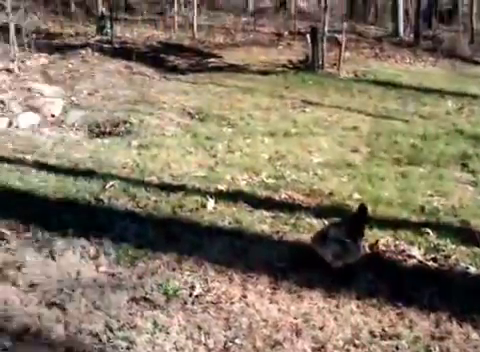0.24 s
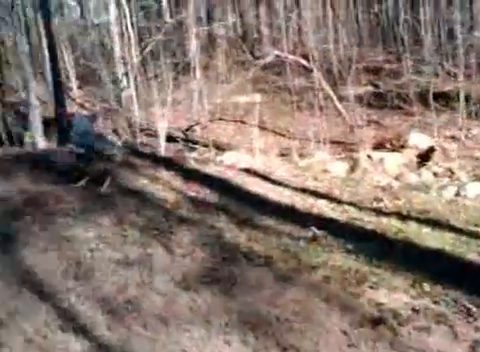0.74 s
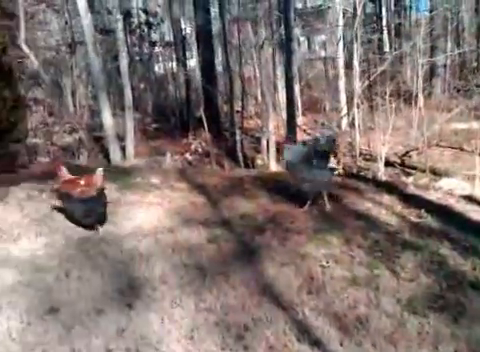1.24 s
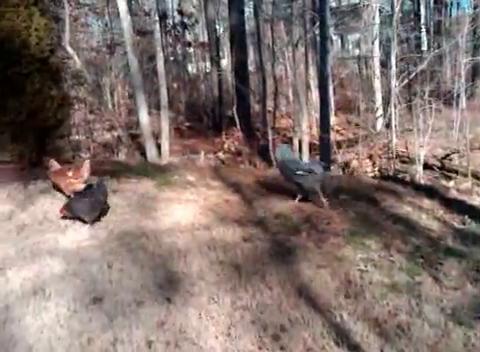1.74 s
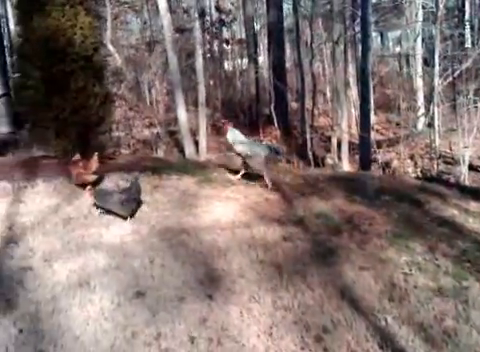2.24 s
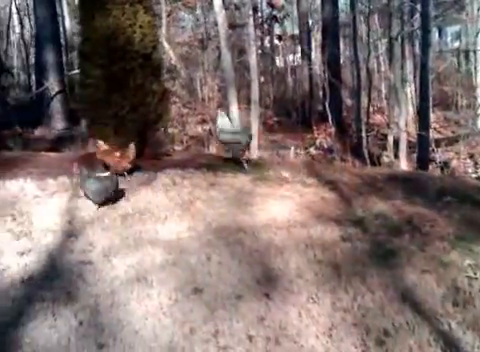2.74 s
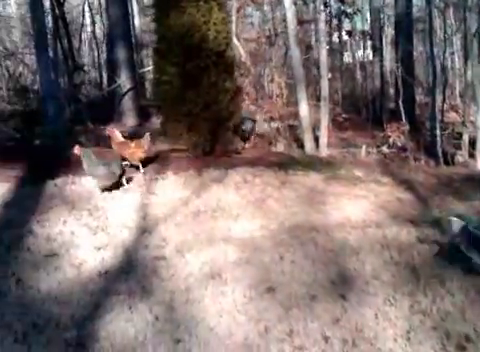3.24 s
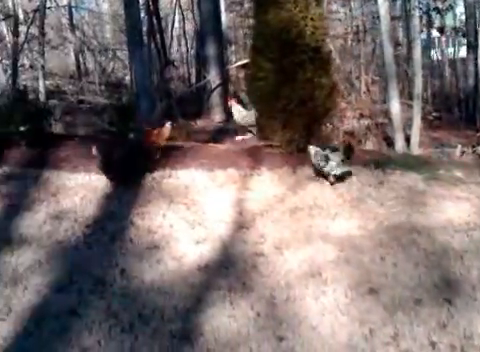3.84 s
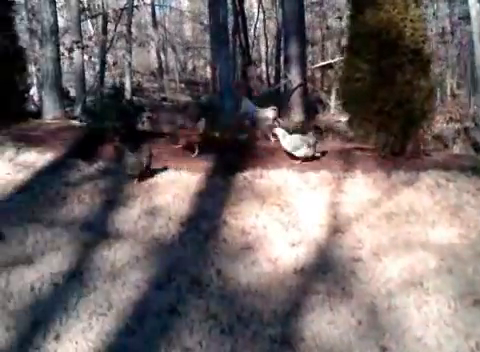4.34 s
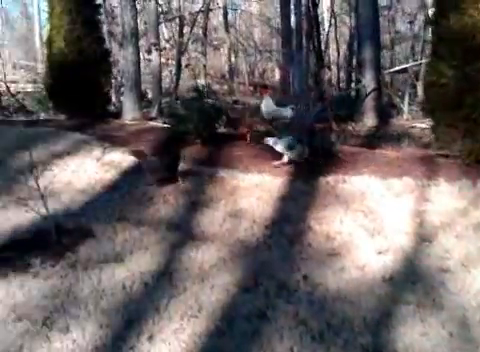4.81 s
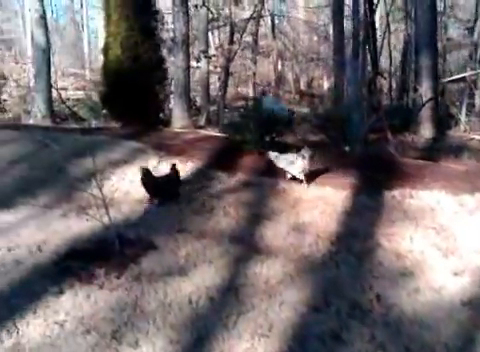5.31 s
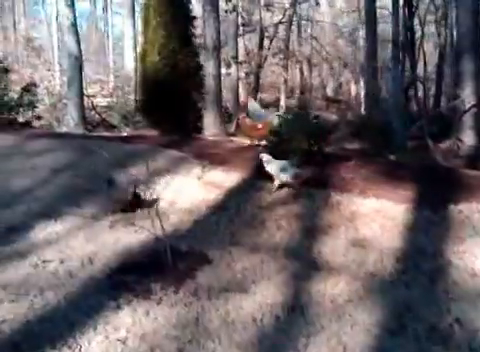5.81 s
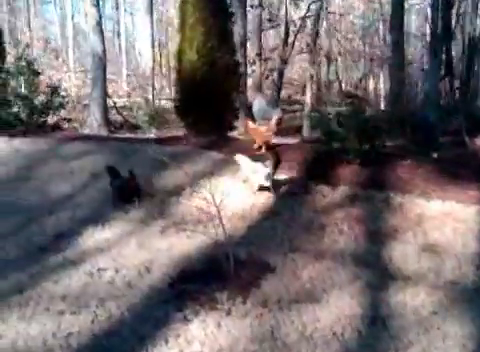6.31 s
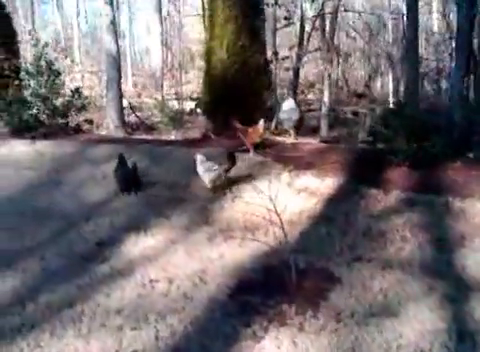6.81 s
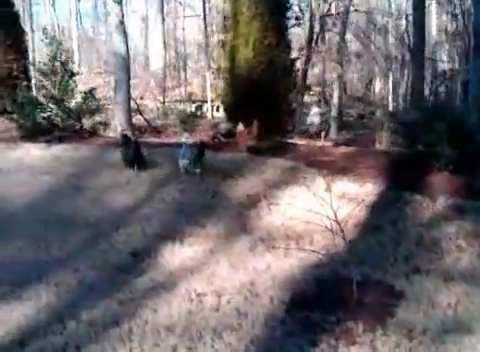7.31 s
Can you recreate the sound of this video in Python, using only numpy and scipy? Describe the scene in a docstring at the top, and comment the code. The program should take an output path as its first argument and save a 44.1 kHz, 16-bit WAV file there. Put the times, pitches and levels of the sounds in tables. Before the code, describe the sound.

Outdoors at the edge of a wood, chickens a few metres away scratch through dry leaves and pine straw. A raspy throbbing hen call and cracking twigs come first amid rumbling, thumping wind on the microphone. Then crisp footsteps and stalk ticks grow busiest, with one sharp twig snap, before soft low clucks, scattered rustles and a few last wind thumps.

```python
"""Chickens roam over dry leaves and pine straw at the edge of a wood, a few metres away.
At first, feet crush swarms of brittle leaf fragments, a hen rasps and twigs crack in rumbling, thumping wind.
From about 2 to 4 seconds the steps are busiest: stalks tick, curled leaves cave in and one more twig cracks.
Then come soft clucks, made of short gliding voice cycles with hoarse air, most of them around 5 seconds.
Steps and ticks return, with wind thumps and a few last clucks; the flock stirs the litter all along."""
import sys
import numpy as np
from scipy import signal
from scipy.fft import rfft, irfft, next_fast_len
from scipy.io import wavfile
from scipy.ndimage import uniform_filter1d

SR = 44100
rng = np.random.default_rng(int(sys.argv[2]) if len(sys.argv) > 2 else 0)


def dump(signal):
    """Clip the signal to [-1, 1] and save it as 16-bit WAV at the path in sys.argv[1]."""
    limited = np.clip(np.atleast_2d(signal).T, -1, 1)
    pcm = np.round(limited * 32767).astype(np.int16)
    wavfile.write(sys.argv[1], SR, pcm)


N = 333101
T = np.arange(N) / SR  # time of every sample in seconds
TOP_HZ = 7400  # upper edge of the microphone's band


def undb(db):
    """Turn decibels into gain."""
    return 10 ** (np.asarray(db) / 20)


def unit(x):
    """Scale to an average strength (rms) of 1."""
    return x / np.sqrt(np.mean(x ** 2) + 1e-30)


def curve(rows):
    """Join the columns of a table by straight lines in time; the first column is the time."""
    s, *columns = np.transpose(rows)
    return [np.interp(T, s, c) for c in columns]


def tint(x, points):
    """Colour a sound with the given (Hz, dB) spectrum, with no sound ahead of its cause."""
    size = next_fast_len(len(x) + 4096, True) // 2 * 2
    hz, db = np.transpose(points)
    bin_hz = np.arange(size // 2 + 1) * SR / size
    log_gain = np.log(undb(np.interp(np.log(bin_hz + 1), np.log(hz), db)))
    # folding the cepstrum gives the filter that reacts soonest (minimum phase)
    cepstrum = irfft(log_gain)
    cepstrum[1:size // 2] *= 2
    cepstrum[size // 2 + 1:] = 0
    response = np.exp(rfft(cepstrum))
    return irfft(rfft(x, size) * response)[:len(x)]


def ring(x, hz, width_hz):
    """Pass a sound through one resonance, with gain 1 at its centre."""
    return signal.lfilter(*signal.iirpeak(hz, hz / width_hz, fs=SR), x)


def top_cut(x):
    """Cut steeply above the edge of the microphone's band."""
    return signal.sosfilt(signal.ellip(10, .2, 70, TOP_HZ, fs=SR, output="sos"), x)


def walk(rate, size):
    """Wander at random without jumps, with a spread near 1 and about `rate` new aims per second."""
    k = max(int(SR / rate), 2)
    held = np.repeat(rng.standard_normal(size // k + 1), k)
    return uniform_filter1d(held, k)[:size] * np.sqrt(3 / 2)


def around(s, before, after):
    """Give the samples near a moment, and their times relative to it."""
    span = slice(max(int((s - before) * SR), 0), min(int((s + after) * SR), N))
    return span, T[span] - s


def ping(t, hz, crest_s):
    """A ring that starts at t = 0, swells to its crest and dies within a few cycles."""
    age = np.maximum(t, 0) / crest_s
    return np.sin(2 * np.pi * hz * t) * age * np.exp(1 - age)


def fragments(rate, spread_db, spectrum, own_db=3, focus_hz=1100):
    """Tiny fractures of unequal size; each rings around its own pitch, and the colour shifts by leaf."""
    leaves_per_s, shift_db = 30, 2.5
    at = rng.integers(0, N, int(rate * N / SR))
    size = undb(spread_db * np.minimum(rng.standard_normal(len(at)), 2))
    leaf = at * leaves_per_s // SR
    pitch = rng.uniform(-1000, 8500, len(at))
    out = 0
    for hz in np.arange(250, 7500, 500):
        colour = undb(own_db * np.clip(rng.standard_normal(len(at)), -2, 2))
        colour = colour / (1 + ((hz - pitch) / focus_hz) ** 2)
        colour = colour * undb(shift_db * rng.standard_normal(leaf.max() + 1)[leaf])
        sign = rng.choice([-1, 1], len(at))
        clicks = np.bincount(at, size * colour * sign, N)
        out = out + ring(clicks, hz, 600)
    return unit(top_cut(tint(out, spectrum)))


def wind(gust_db=-2.0, flutter_db=3.0, buffet_db=-1, buffet_flutter_db=3, hush_db=-57.5):
    """Eddies rumble and buffet on the microphone over the steady hush of the wood."""
    # Wind on the microphone. Each row: time in seconds, level in dB before gust_db.
    wind_levels = [(0, -53.5), (.3, -54), (.39, -42), (.5, -54), (.61, -44), (.72, -50), (1.1, -46),
                   (1.32, -43.5), (1.5, -51), (1.6, -55), (2.48, -59.5), (2.69, -50), (3.0, -57),
                   (4.35, -57.5), (4.83, -52), (5.3, -51), (5.78, -48.5), (6.2, -53), (6.4, -51),
                   (6.68, -52.5), (6.81, -51), (7.36, -56.5), (7.55, -43.5)]
    # Buffeting as the microphone moves through the air. Each row: time in seconds, level in dB before buffet_db.
    buffet_levels = [(0, -74), (.3, -60.5), (.55, -53), (.83, -60.5), (.93, -50), (.97, -54.5), (1.04, -48),
                     (1.12, -54.5), (1.2, -67), (1.35, -57), (1.6, -79), (2.55, -60.5), (2.7, -58.5),
                     (3.4, -63), (3.9, -67.5), (6.2, -68), (7.55, -60)]
    # Colours of rumble, buffeting and hush. Each row: frequency in Hz, relative strength in dB per Hz.
    gust_colour = [(10, -6), (25, 2.5), (45, -6.5), (70, -4.5), (110, -20), (180, -22.5), (400, -42),
                   (1500, -72.5)]
    buffet_colour = [(30, -9.5), (70, -3), (170, -1.5), (300, -11.5), (600, -16), (1500, -28.5),
                     (6000, -63.5)]
    hush_colour = [(20, -11), (55, -2.5), (85, 1), (115, -6), (160, -9), (250, -13.5), (500, -16.5),
                   (800, -20.5), (1300, -27.5), (2400, -33.5), (5800, -39), (7400, -44)]

    rumble_db = curve(wind_levels)[0] + gust_db + flutter_db * walk(9, N)
    rumble = unit(tint(rng.standard_normal(N), gust_colour)) * undb(rumble_db)
    swing_db = curve(buffet_levels)[0] + buffet_db + buffet_flutter_db * walk(25, N)
    buffet = unit(tint(rng.standard_normal(N), buffet_colour)) * undb(swing_db)
    hush = unit(top_cut(tint(rng.standard_normal(N), hush_colour))) * undb(hush_db)
    return rumble + buffet + hush


def thumps(cycles=0.57, gain_db=-1.0):
    """A large eddy or a jolt shoves the microphone's diaphragm once or twice."""
    # Single gusts and jolts. Each row: crest in seconds, level in dB before gain_db, pitch in Hz.
    thump_table = [(.397, -44, 68.6), (.55, -37, 53), (.605, -35.5, 46.3), (.648, -42, 37.7),
                   (.788, -38, 65), (.904, -39.5, 190), (.908, -37, 30), (1.023, -34, 320),
                   (1.073, -34, 69), (1.125, -36.5, 38.5), (1.284, -36, 75.5), (1.337, -34.5, 62),
                   (1.431, -36, 45), (1.505, -37.5, 49.5), (5.726, -37, 33.5), (5.794, -40.5, 40),
                   (6.325, -44.5, 85), (6.433, -41, 80), (6.606, -38, 72), (6.762, -36.5, 42),
                   (6.836, -33, 49), (6.982, -38.5, 32.7), (7.149, -40, 40.4), (7.533, -35, 44.4)]
    out = np.zeros(N)
    for s, db, hz in thump_table:
        span, t = around(s, .08, .08)
        swell = np.exp(-(t * hz / cycles) ** 2)
        out[span] += undb(db + gain_db) * swell * np.sin(2 * np.pi * (hz * t + rng.random()))
    return out


def clucks(beak_width_hz=560, chest_db=-7, upper_hz=1550, upper_db=-18, closing=8, dull_ratio=2.0,
           open_hz=620, open_db=14):
    """A few uneven, gliding syrinx (voice organ) cycles with hoarse air, darkening as the beak closes."""
    # Soft clucks. Each row: crest in seconds, half length in seconds, pitch at the crest in Hz,
    # glide in octaves per second, beak resonance at the crest in Hz, level in dB.
    cluck_table = [(3.134, 0.015, 266.3, 5.5, 620, -47.5), (3.245, 0.022, 257.4, -4, 520, -52),
                   (4.876, 0.008, 302.4, -6, 825, -46.5), (4.893, 0.014, 276, -9, 587, -48),
                   (4.994, 0.014, 254.6, -5, 463, -50), (5.155, 0.013, 261, 5, 734, -51.5),
                   (5.275, .014, 261, 3, 596, -52), (5.385, 0.015, 265.3, -3.5, 527, -49.5),
                   (5.508, 0.012, 268.4, 2, 764, -50.5), (5.63, 0.01, 233.2, 5, 656, -50.5),
                   (5.699, 0.0048, 292, -5, 820, -56), (5.768, 0.011, 289.6, -6, 680, -54),
                   (6.872, 0.018, 282, 2, 645, -47.5), (6.907, 0.0046, 318.6, -4, 950, -47),
                   (7.064, 0.023, 227.7, 3, 514, -57), (7.248, 0.0083, 249.7, 5, 490, -47),
                   (7.261, .013, 269, 4, 570, -49)]
    jitter, shimmer_db, hoarse_db = .035, 2, -16
    attack_share = .8  # the rise lasts this share of the half length
    out = np.zeros(N)
    order = np.arange(1, 10)[:, None]  # the fundamental and its overtones
    for s, half, pitch, glide, beak_hz, db in cluck_table:
        span, t = around(s, .045, .045)
        hz = pitch * 2 ** (glide * t) * (1 + jitter * walk(281.0, len(t)))
        closing_hz = beak_hz * np.exp(-closing * t)
        beak = 1 / (1 + 2j * (order * hz - closing_hz) / beak_width_hz) ** 2
        dull = 1 / (1 + (order * hz / (dull_ratio * beak_hz)) ** 8)
        # a wider open beak has a higher resonance and a stronger upper one
        upper_gain = undb(upper_db + open_db * np.log2(beak_hz / open_hz))
        upper = upper_gain / (1 + 1j * (order * hz - upper_hz) / beak_width_hz) ** 2
        chest = 1j * undb(chest_db) * (order == 1)
        gains = beak * dull + upper + chest
        cycles = np.exp(2j * np.pi * order * np.cumsum(hz) / SR)
        voice = np.real(gains * cycles).sum(axis=0) * undb(shimmer_db * walk(pitch, len(t)))
        air = ring(ring(rng.standard_normal(len(t)), beak_hz, 500), beak_hz, 500)
        shape = np.exp(-np.where(t < 0, (t / (attack_share * half)) ** 4, (t / half) ** 2))
        out[span] += undb(db) * unit(unit(voice) + undb(hoarse_db) * unit(air)) * shape
    return out


def rasp(second_db=-20, third_db=-30, hoarse_lag_hz=70, wear_db_per_s=70):
    """A hen's syrinx bursts open in throbs, its pitch scooping in each; hoarse air grows along the note."""
    # Notes of the call. Each row: start in seconds, end in seconds, pitch in mid-note in Hz, sag in Hz per second,
    # throbs per second, level in dB, time of the accented throb in seconds, its extra level in dB,
    # hoarse air in mid-note in dB relative to the note.
    note_table = [(0.268, 0.318, 835, 0, 57, -43, .2755, 10, -11),
                  (0.33, 0.37, 815, 1700, 76, -41.5, .361, 4.5, -7.5),
                  (.428, .438, 795, 0, 61, -48, .432, 0, -10),
                  (0.44, 0.52, 785, 0, 61, -39.5, .482, 8, -7.5),
                  (.666, .711, 750, 1500, 64, -38, .691, 2.5, -12)]
    # Resonances of the throat. Each row: frequency in Hz, width in Hz, level in dB.
    throat = [(760, 420, 0), (1800, 300, 0), (2700, 200, -9), (3700, 260, -3)]
    jitter, scoop, shimmer_db, stagger_s = .085, .02, 2.2, .0015
    throb_rise_s, throb_fall_s, throb_scatter_db = .0042, .0072, 1
    hard_throb_db = 20  # a throb that is this much harder dies twice as fast
    out = np.zeros(N)
    for start, end, pitch, sag, rate, db, accent, accent_db, hoarse_db in note_table:
        span, t = around(accent, .08, .08)
        beats = np.arange(np.ceil((start - accent) * rate), (end - accent) * rate)  # 0 is the accent
        scatter_db = throb_scatter_db * rng.standard_normal(len(beats))
        extra_db = np.where(beats == 0, accent_db, scatter_db)
        stagger = stagger_s * (beats != 0) * rng.standard_normal(len(beats))
        age = t - (beats / rate + stagger)[:, None]
        fall = throb_fall_s / 2 ** (extra_db[:, None] / hard_throb_db)
        shapes = np.exp(-(age / np.where(age < 0, throb_rise_s, fall)) ** 2)
        along = T[span] - (start + end) / 2
        hz = (pitch - sag * along) * (1 + scoop * np.sin(2 * np.pi * rate * t))
        phase = 2 * np.pi * np.cumsum(hz * (1 + jitter * walk(500, len(t)))) / SR
        voice = np.sin(phase) + undb(second_db) * np.sin(2 * phase) + undb(third_db) * np.sin(3 * phase)
        air = rng.standard_normal(len(t)) * (1 + np.sin(phase))  # air escapes once a cycle
        # two passes, each 1.5 times as wide, together come close to the listed width
        hoarse = unit(sum(undb(d) * ring(ring(air, f, 1.5 * w), f, 1.5 * w) for f, w, d in throat))
        # the air flow follows the throbs a little late and evens out their strength
        flow = signal.lfilter(*signal.butter(1, hoarse_lag_hz, fs=SR), undb(db + extra_db / 2) @ shapes)
        throbs = undb(db + extra_db) @ shapes
        out[span] += throbs * undb(shimmer_db * walk(450, len(t))) * np.sqrt(2) * voice
        out[span] += undb(hoarse_db + wear_db_per_s * along) * flow * hoarse
    return out


def cracks(tail_db=-22, tail_s=0.088, strain_db=-25, strain_s=0.0032, ring_rise_s=0.00078):
    """A twig strains, its fibres tear within milliseconds, the wood rings on and the litter crumbles on."""
    # Twigs close by. Each row: crack in seconds, fibre level in dB, rise in seconds, length in seconds,
    # treble tilt in dB per octave, pitch of the twig as a ratio, ring level in dB.
    crack_table = [(0.548, -34, 0.0024, 0.0038, 3.5, 1.26, -39),
                   (.735, -33, 0.0028, 0.0038, 3, 1.13, -33.5), (0.7543, -35, 0.0015, 0.0028, 8, 1.03, -36),
                   (0.7609, -43, .001, 0.0049, -1, 0.64, -38.5),
                   (0.902, -37.5, 0.0043, 0.0046, 1, 0.93, -34.5),
                   (0.923, -38.5, 0.0014, 0.0021, 4, 0.78, -43),
                   (1.424, -40.5, 0.0037, 0.005, 2, 1.06, -45),
                   (2.644, -30, 0.00072, 0.0045, 4, 1.005, -27.5),
                   (2.652, -44, 0.0013, .003, -2, 0.89, -41.5)]
    # What a twig rings with at ratio 1. Each row: frequency in Hz, width in Hz, level in dB.
    twig_modes = [(190, 45, -10), (262, 50, -7), (730, 110, -2), (900, 120, -2), (1100, 170, -.5),
                  (1745, 90, -6), (2570, 140, -3), (2890, 110, -6), (3730, 110, 0), (4780, 160, -6),
                  (5280, 200, -6), (6170, 180, 1)]
    # Colour of the tearing fibres before the tilt. Each row: frequency in Hz, relative strength in dB per Hz.
    fibre_colour = [(100, 7), (240, 4.5), (450, -6), (900, -1), (1450, -9.5), (2100, -4.5), (3000, -7.5),
                    (4200, -10), (5800, -9.5), (7400, -21.5)]
    out = np.zeros(N)
    for s, db, rise, length, tilt_db, ratio, ring_db in crack_table:
        span, t = around(s, 0.016, 0.04)
        wood = [(hz, d + tilt_db * np.log2(hz / 2000)) for hz, d in fibre_colour]
        strain = undb(strain_db) * np.exp(-np.abs(t) / strain_s)
        tail = undb(tail_db) * np.exp(-np.abs(t) / tail_s)
        crumble = np.where(t < 0, strain, tail) * undb(4.1 * walk(300, len(t)))
        burst = np.exp(-(t / np.where(t < 0, rise, length)) ** 2) + crumble
        tearing = tint(burst * rng.standard_normal(len(t)), wood)
        through_wood = sum(undb(d) * ring(tearing, ratio * hz, 2 * width) for hz, width, d in twig_modes)
        fibres = unit(top_cut(through_wood)) * np.sqrt(np.mean(burst ** 2))
        age = np.maximum(t, 0)
        modes = 0
        for hz, width, d in twig_modes:
            swing = np.sin(2 * np.pi * (ratio * hz * age + rng.random()))
            modes = modes + undb(d) * np.exp(-np.pi * width * age) * swing
        out[span] += undb(db) * fibres + undb(ring_db) * modes * (1 - np.exp(-age / ring_rise_s))
    return out


def ticks(crest_s=0.00014, snap_s=0.0004, snap_db=-4, gain_db=1, scatter_db=-3.5, scatter_hz=450):
    """A stalk gives way with a snap and a tiny ring; fainter ones tick at random times."""
    # The clearest dry stalks. Each row: start in seconds, peak in dB before gain_db, ring in Hz.
    tick_table = [(0.084, -29.5, 6100), (.151, -33, 6440), (.3358, -33, 3640), (.5115, -42, 4500),
                  (0.5767, -43, 3000), (1.0535, -36, 2610), (1.851, -33.5, 5860), (1.9316, -35, 4500),
                  (1.944, -37, 5500), (1.972, -31, 6900), (2.062, -22.5, 6200), (2.113, -34, 5850),
                  (2.145, -31.5, 5360), (2.2585, -36, 6310), (2.2745, -32.5, 5500), (2.5716, -36, 5800),
                  (2.7223, -31, 6230), (3.294, -33, 6470), (3.331, -33, 5600), (3.658, -27, 6000),
                  (2.761, -22, 6100), (2.945, -26.5, 4470), (3.214, -35, 3040), (3.2495, -26, 5950),
                  (3.3978, -33, 2980), (3.471, -34, 3970), (3.488, -31, 5430), (3.5345, -30.5, 5640),
                  (3.9054, -37.5, 5540), (3.9166, -28, 6600), (4.1245, -44, 6200), (4.239, -38, 5450),
                  (4.379, -36, 6160), (4.444, -35.5, 4070), (4.611, -38.5, 5760), (5.347, -31.5, 5400),
                  (5.509, -29, 2470), (5.631, -42, 5240), (5.8542, -26, 6700), (5.8895, -34, 6100),
                  (5.9131, -28.5, 6470), (6.032, -31, 5840), (6.0958, -35, 6360), (6.1635, -34, 6070),
                  (6.4022, -36, 6600), (6.6184, -37, 5850), (7.149, -28, 6630), (7.395, -38.5, 6000)]
    faint_per_s, faint_db, faint_hz = 1.7, -42, 6500  # level and pitch before their scatter
    out = np.zeros(N)
    # negative draws of the time fold over, so faint ticks are denser early on
    chance = rng.uniform(-0.42, 1, (int(faint_per_s * N / SR), 3))
    faint = [(abs(a) * (T[-1] - .02), faint_db + scatter_db * b, faint_hz + scatter_hz * c)
             for a, b, c in chance]
    for s, db, hz in tick_table + faint:
        span, t = around(s, 0, 0.0094)
        snap = 2 * rng.standard_normal(len(t)) * np.exp(-t / snap_s)
        snap = ring(ring(snap, 4800, 5000), 4800, 5000)
        tick = ping(t, hz, crest_s) + undb(snap_db) * snap
        out[span] += undb(db + gain_db) * tick / np.abs(tick).max()
    return out


def curled_leaves(pass_width_hz=1300, grain_db=4, gain_db=0):
    """A curled leaf caves in with a hollow crunch: a quick run of fractures rings its hollow."""
    # Whole curled leaves. Each row: crest in seconds, half length in seconds, resonance in Hz,
    # level in dB before gain_db.
    curled_table = [(1.022, 0.011, 1210, -51.5), (1.055, 0.021, 1610, -53.5), (2.741, 0.011, 650, -56),
                    (2.775, 0.0041, 1080, -47), (2.802, .006, 945, -49), (3.246, 0.013, 3480, -44.5),
                    (4.007, 0.003, 1660, -48.5), (5.517, 0.0076, 2430, -47.5), (5.539, 0.0088, 1500, -54),
                    (5.844, 0.0089, 2030, -49.5), (5.868, 0.021, 1940, -54), (5.862, 0.0084, 3100, -43),
                    (6.03, 0.02, 1820, -57.5), (6.243, 0.013, 2580, -53), (6.245, 0.0074, 950, -51),
                    (6.908, 0.013, 1710, -54.5)]
    out = np.zeros(N)
    for s, half, hz, db in curled_table:
        span, t = around(s, .04, .04)
        at = rng.integers(0, len(t), 120)
        size = undb(grain_db * np.clip(rng.standard_normal(len(at)), -2, 2))
        breaks = np.bincount(at, size * rng.choice([-1, 1], len(at)), len(t))
        hollow = unit(ring(ring(breaks, hz, pass_width_hz), hz, pass_width_hz))
        out[span] += undb(db + gain_db) * hollow * np.exp(-(t / half) ** 2)
    return out


def leaves(sharpness=5.8, stir_crackle_db=1, stir_crunch_db=-3):
    """Feet press and let go: top leaves crackle, litter below crunches; the flock stirs on between steps."""
    # Steps in the leaves. Each row: crest in seconds, length in seconds, crackle level in dB,
    # low crunch of the pressed litter in dB relative to the crackle.
    step_table = [(0.101, 0.053, -53, -3.5), (0.335, 0.016, -50.5, 1), (0.578, 0.026, -49, -5),
                  (0.535, 0.063, -52, -6.5), (0.681, 0.082, -53.5, -4), (0.898, 0.026, -53, 8.5),
                  (0.924, 0.027, -51.5, 3.5), (1.026, 0.015, -54, 6), (1.051, 0.034, -50.5, 2),
                  (1.11, 0.22, -61, -0.5), (1.783, 0.053, -51.5, -15), (1.927, 0.032, -50, -23),
                  (1.964, 0.035, -47.5, -23), (2.09, 0.076, -56, -26), (2.264, 0.041, -47.5, -13),
                  (2.376, 0.015, -47, -10), (2.516, 0.09, -53, -11), (2.571, 0.029, -49.5, -11.5),
                  (2.652, 0.029, -41, -9.5), (2.698, 0.05, -43.5, -15), (2.722, 0.029, -43, -14),
                  (2.766, 0.0083, -56, 3.5), (2.809, 0.061, -54.5, -5), (2.862, 0.032, -47.5, -10),
                  (2.935, 0.064, -46, -8), (3.058, 0.088, -55, -17), (3.221, 0.018, -49, -7),
                  (3.249, 0.046, -45.5, -7.5), (3.293, 0.01, -51, -20), (3.364, 0.029, -45.5, -25),
                  (3.398, 0.0098, -53.5, 1), (3.472, 0.011, -51, -16), (3.542, 0.024, -50.5, -2),
                  (3.656, 0.033, -46.5, -21), (3.68, 0.026, -44, -12.5), (3.612, 0.015, -54, -10),
                  (3.836, 0.022, -53, -20), (3.916, 0.033, -52, -9.5), (4.008, 0.0063, -58, 2),
                  (4.129, 0.02, -47.5, -12), (4.239, 0.037, -51, -16), (5.348, 0.036, -56, -19),
                  (5.518, 0.026, -56, 5), (5.591, 0.08, -53.5, -10.5), (5.838, 0.019, -46, -20),
                  (5.862, 0.04, -42, -21), (6.018, 0.046, -47.5, -16), (6.236, 0.031, -54.5, 0),
                  (6.358, 0.031, -52.5, -20), (6.437, 0.018, -52, -29), (6.593, 0.086, -52, -24),
                  (6.795, 0.1, -57, -27), (6.898, 0.033, -67, 9), (7.017, 0.07, -57, -26),
                  (7.153, 0.027, -49, -21), (7.173, 0.053, -54, -13), (7.27, 0.066, -65.5, 5),
                  (7.368, 0.081, -58, -19)]
    # The whole flock stirring. Each row: time in seconds, crackle level in dB before stir_crackle_db,
    # low crunch level in dB before stir_crunch_db.
    stir_table = [(0.0, -68.5, -62), (0.27, -62.5, -62.5), (0.5, -63, -55.5), (0.95, -58, -58.5),
                  (1.7, -65.5, -63.5), (2.0, -58.5, -61), (2.52, -59.5, -69), (2.78, -52, -58.5),
                  (3.05, -58, -59), (3.19, -65.5, -59), (3.3, -56.5, -56), (3.53, -56.5, -55),
                  (3.93, -66, -64), (4.39, -62.5, -63.5), (4.71, -68.5, -64), (5.28, -70, -62.5),
                  (6.03, -58, -62.5), (6.64, -67.5, -61), (7.19, -64.5, -63.5), (7.55, -71, -64)]
    # Colours of top leaves and litter. Each row: frequency in Hz, relative strength in dB per Hz.
    leaf_colour = [(800, -30.5), (1600, -15), (2600, -9.5), (3800, -5.5), (5200, -2), (6300, 0.5),
                   (7300, -4.5)]
    litter_colour = [(120, -2.5), (350, 6.5), (900, 3.5), (1900, 0), (3000, -1.5), (5000, -4.5),
                     (7500, -23)]
    step_spread_db, stir_spread_db, clump_db = 4.5, 4, 2
    press_share = 0.47  # part of a step spent pressing down; the rest is release
    crackle, crunch = np.zeros(N), np.zeros(N)  # power of the steps over time
    for s, length, db, low_db in step_table:
        rise, fall = length * press_share, length * (1 - press_share)
        span, t = around(s, 4 * rise, 4 * fall)
        press = undb(db) * np.exp(-np.abs(t / np.where(t < 0, rise, fall)) ** sharpness)
        crackle[span] += press ** 2
        crunch[span] += (press * undb(low_db)) ** 2
    steps = np.sqrt(crackle) * fragments(3200, step_spread_db, leaf_colour)
    steps = steps + np.sqrt(crunch) * fragments(3000, step_spread_db, litter_colour)
    steps = steps * undb(clump_db * walk(220, N))  # fractures come in clumps
    high_db, low_db = curve(stir_table)
    stir = undb(high_db + stir_crackle_db) * fragments(3500, stir_spread_db, leaf_colour)
    stir = stir + undb(low_db + stir_crunch_db) * fragments(6000, step_spread_db, litter_colour)
    return steps + stir


def scene():
    """Wind, hens and feet at one microphone."""
    air = wind() + thumps()
    hens = clucks() + rasp()
    ground = cracks() + ticks() + curled_leaves() + leaves()
    return (air + hens + ground)[None]


def record(dry):
    """The recorder keeps next to nothing above its narrow band."""
    return top_cut(dry)


dry = scene()
out = record(dry)
dump(out)
```